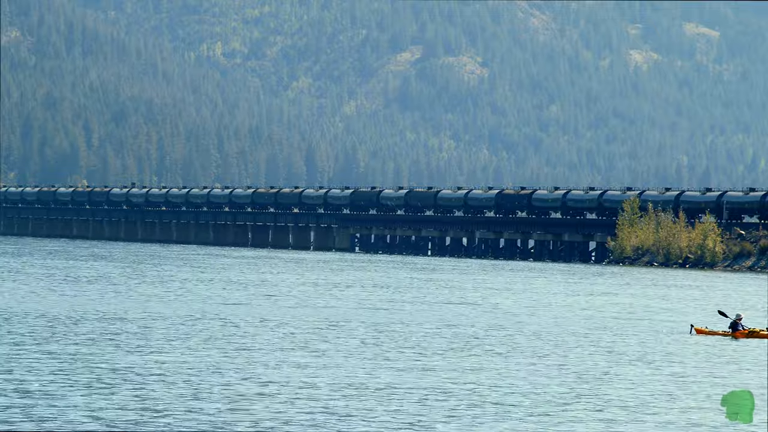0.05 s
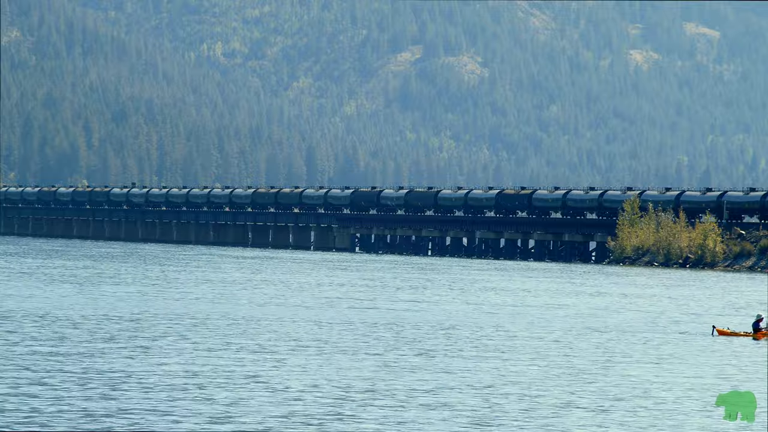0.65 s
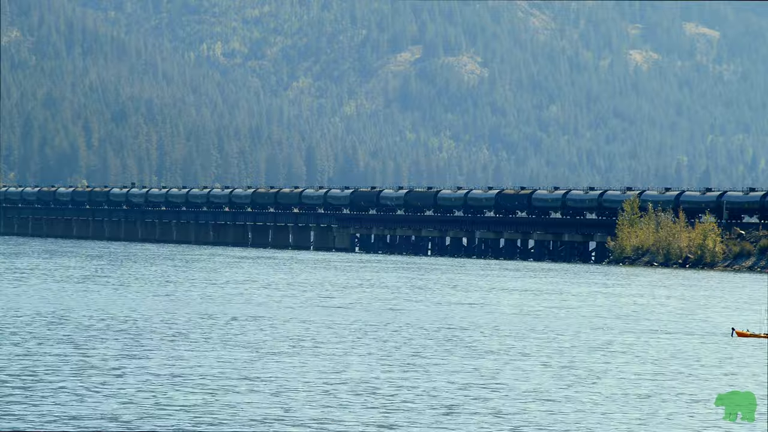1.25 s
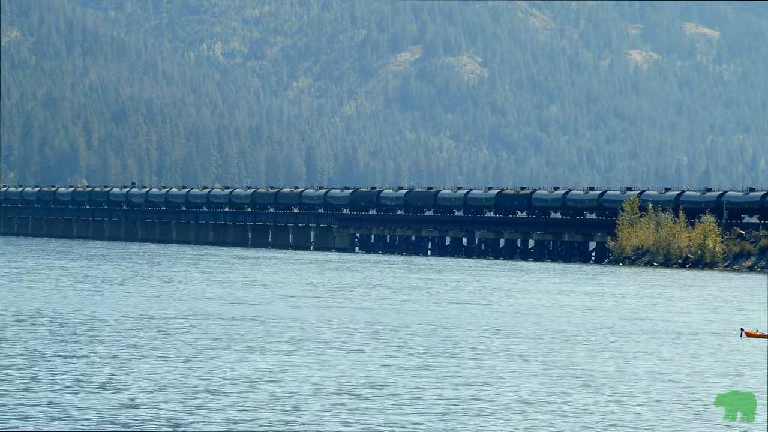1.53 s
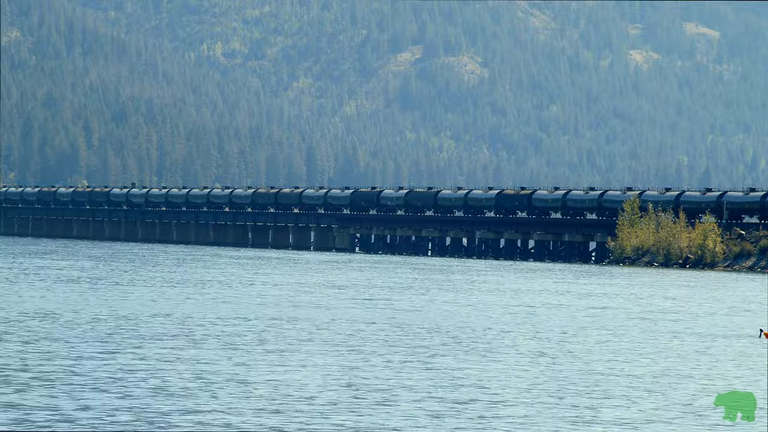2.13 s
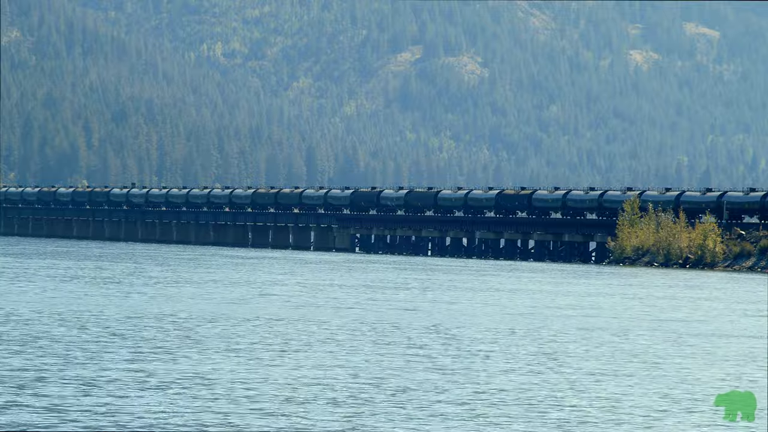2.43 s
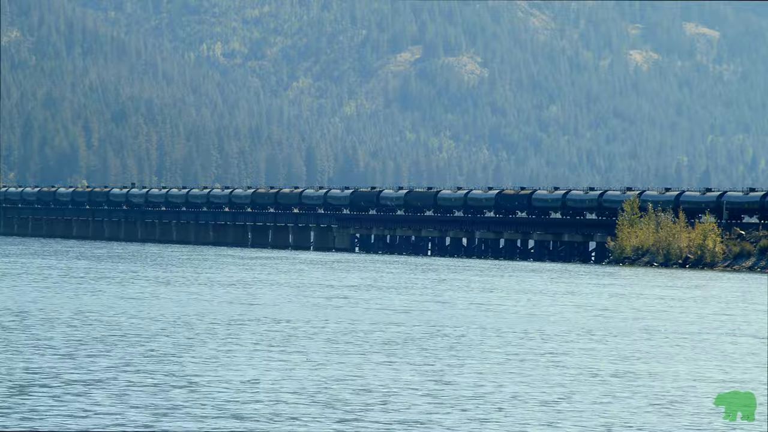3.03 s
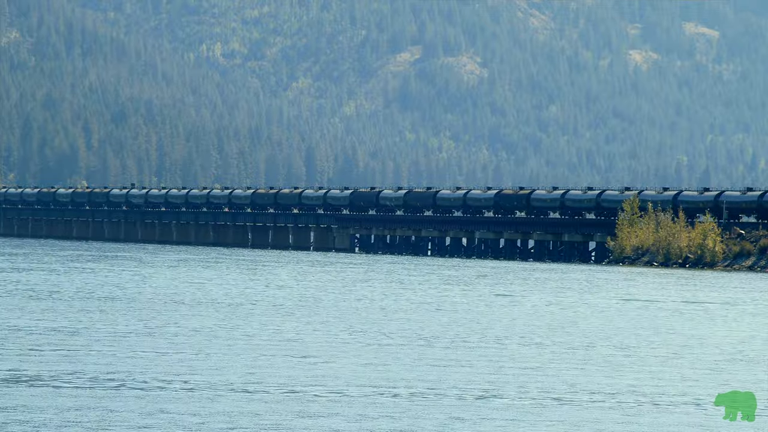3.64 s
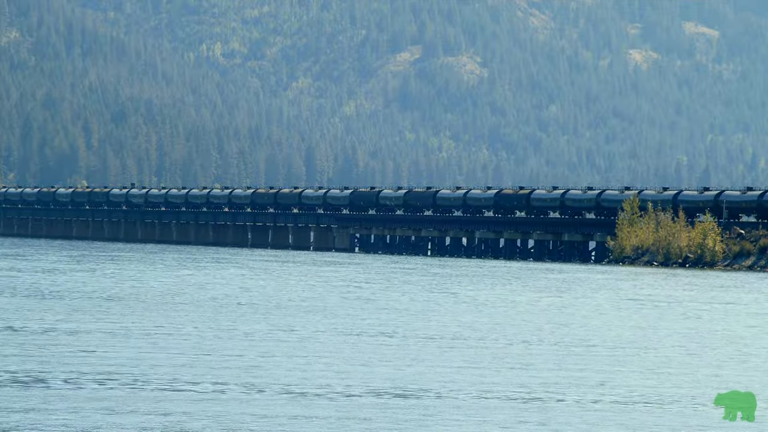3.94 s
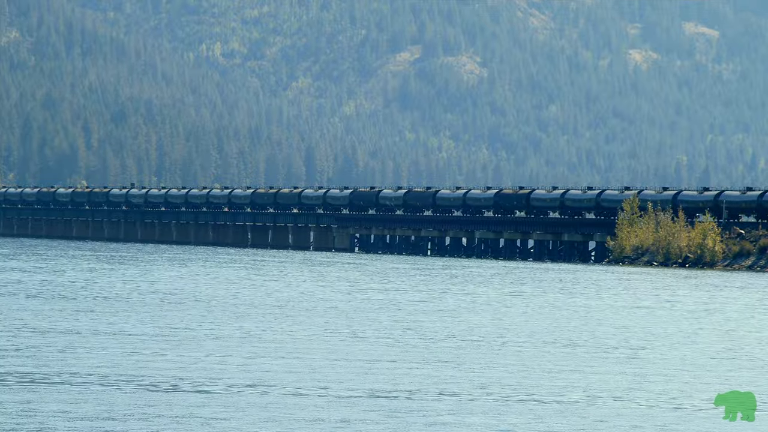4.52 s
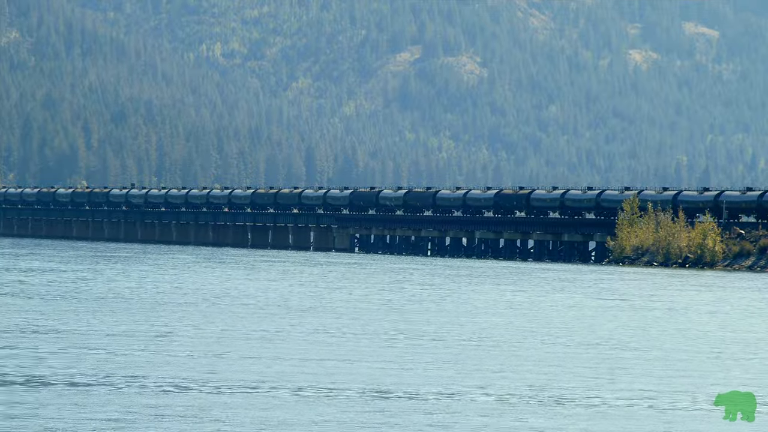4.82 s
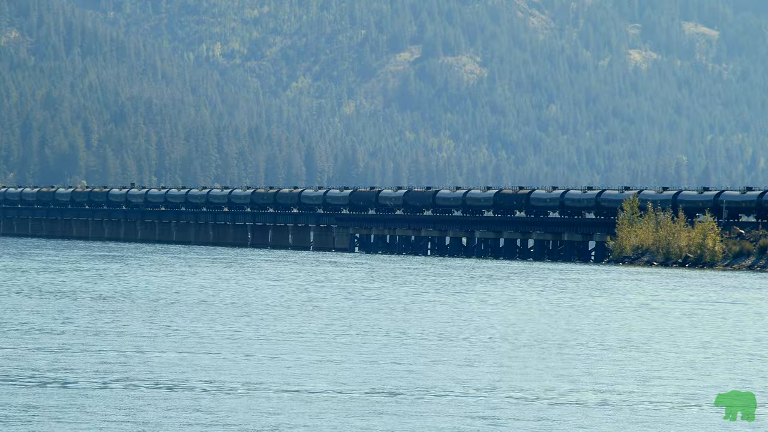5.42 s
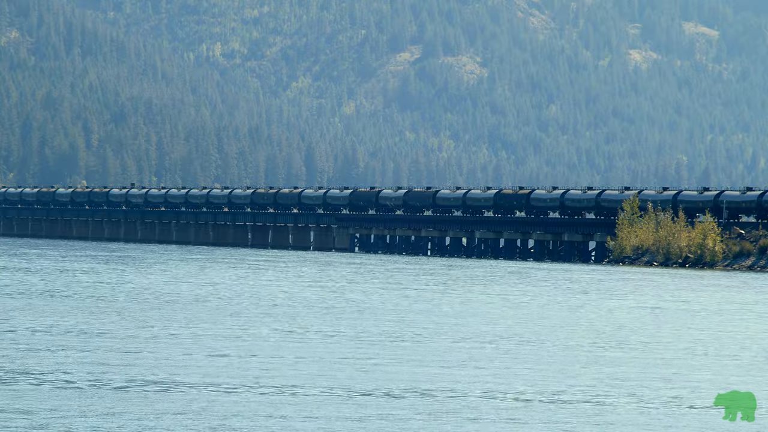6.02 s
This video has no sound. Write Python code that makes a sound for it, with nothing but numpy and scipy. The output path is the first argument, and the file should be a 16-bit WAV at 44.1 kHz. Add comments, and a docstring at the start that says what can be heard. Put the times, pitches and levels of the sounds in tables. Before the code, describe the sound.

Throughout, a distant freight train crosses a trestle over a lake: a dull, steady wheel roar, slightly right, with low droning tones that waver and come and go. The hillside adds a bassy echo, and light wind rumbles faintly on the microphones. Close by, small waves wash a gravel shore with soft fizz, ticks of spray and tiny ringing bubbles. One gentle wash swells from 1 to 1.5 seconds, followed by a rounded plop near 1.9. At about 3.2 seconds a bigger wave slaps down in the middle, with a quick run of sloshes until 4.2. Trapped air thumps and throbs deeply beneath it until about 5 seconds, as churning bubbles and foam run off to the left. This second half is louder and splashier. Around 5.8 seconds another wash rises with bright fizz and sharp droplets, still running at the end, just after 6 seconds.

```python
"""A dull roar of wheels and a wavering drone: a long freight train crosses a trestle far over a lake,
echoed by the hillside and heard from the shore by a spaced pair of microphones.
Close by, small waves wash the gravel with fizzing foam, ticks of spray and ringing bubbles.
One slaps down in the middle, booms with trapped air, and runs off to the left in bubbles and fizz."""
import sys
import numpy as np
from scipy import signal
from scipy.fft import rfft, irfft
from scipy.io import wavfile
from scipy.ndimage import map_coordinates

SR = 44100
rng = np.random.default_rng(int(sys.argv[2]) if len(sys.argv) > 2 else 0)


def dump(signal):
    """Clip the signal to [-1, 1] and save it as 16-bit WAV at the path in sys.argv[1]."""
    limited = np.clip(np.atleast_2d(signal).T, -1, 1)
    pcm = np.round(limited * 32767).astype(np.int16)
    wavfile.write(sys.argv[1], SR, pcm)


N = 276418
T = np.arange(N) / SR
FREQ = np.maximum(np.arange(N // 2 + 1) * SR / N, 1)

# tone colour of the rolling wheels (frequency [Hz], relative level [dB])
ROAR_EQ = [(20, -13.5), (42, -11.5), (60, -1), (85, -2.5), (125, -7), (160, -2), (205, -6.5), (240, -9.5),
           (310, -18), (480, -15.5), (800, -15), (1050, -19), (1500, -25), (2200, -38.5), (3200, -69)]
# tones of the drone (mid-life pitch [Hz], glide [Hz/s], level before panning [dB], start [s], end [s])
DRONE_TONES = [(59.2, 0, -46, 0, 3.2), (106.5, 0, -47, 0, 4.1), (147, 0, -44.5, 0, 3.7),
               (200, 2.5, -46.5, 0, 4.1), (296, 0, -61, 0, 3.1), (479, 0, -60, 0, 3.1),
               (72, 0, -39.5, 3.4, 3.85), (76.5, 9, -36.5, 4.25, 4.6), (65, 0, -41, 4.3, 4.7),
               (72, 0, -38.5, 5.05, 6.27), (123.5, 0, -45, 3.3, 6.1), (55, 0, -43.5, 4.7, 5.4),
               (54.5, 0, -39.5, 5.75, 6.05), (186, 3, -50, 4.6, 5.7), (204, 0, -53, 5.0, 6.27),
               (336, 0, -57, 3.4, 6.27)]
# path of the wave front along the shore (time [s], lag of the left microphone [ms])
SHORE_PATH = [(1.2, 0.21), (2.4, -1.52), (3.1, 0.18), (3.75, -0.12), (4.2, -0.12), (4.6, -1.54),
              (5.4, -1.15), (6.27, 0.18)]
# small waves on the gravel, levels relative within each layer
# (start [s], run-up [s], drain [s], foam level [dB], fine foam level [dB], tumble level [dB])
SHORE_WAVES = [(-0.4, 0.45, 0.63, -67.5, -67.5, -53), (0.81, 0.046, 0.1, -66.5, -67, -65),
               (0.95, 0.55, 0.89, -59.5, -58.5, -51.5), (2.22, 0.21, 0.41, -65, -78, -64),
               (3.17, 0.68, 0.6, -54.5, -55.5, -57), (3.93, 0.22, 0.53, -52.5, -53, -55),
               (4.6, 0.32, 0.37, -58.5, -58.5, -72), (5.04, 0.11, 0.043, -72, -59, -68),
               (5.8, 0.37, 0.87, -51, -49.5, -49)]
# crests slapping down (time [s], level before low-pass [dB], rise [s], hold [s], decay [s], cutoff [Hz])
CREST_SLAPS = [(3.187, -32.8, .003, .04, .017, 7000), (3.312, -39, .014, .02, .02, 1700),
               (3.408, -39, .02, .01, .015, 1900), (3.45, -37.5, .02, .025, .02, 1200),
               (3.48, -34.5, .022, .038, .016, 4500), (3.588, -39, .016, .015, .02, 2000),
               (3.636, -35.5, .018, .025, .024, 2400), (3.717, -35.5, .01, .012, .012, 1000),
               (3.75, -37.5, .016, .035, .02, 1800), (4.156, -37.5, .014, .02, .015, 1000)]
# air pockets booming (peak time [s], pitch [Hz], level before panning [dB], half length [s])
POCKET_BOOMS = [(1.925, 85, -38, 0.0072), (3.215, 73.4, -26.5, 0.026), (3.472, 72, -24, 0.018),
                (3.573, 68, -24, 0.015), (3.804, 69.3, -26, 0.037), (4.093, 62.5, -26.5, 0.026),
                (4.851, 59, -24, 0.018), (4.956, 61, -25.5, 0.014)]
# the loudest drops of spray (time [s], pitch [Hz], level [dB], decay [s])
SPRAY_DROPS = [(0.815, 6660, -41.5, 0.002), (.893, 6030, -44, .0026), (1.041, 7420, -48, 0.0032),
               (1.115, 6250, -44, .0028), (1.176, 8600, -47, 0.0055), (1.261, 10000, -45, 0.0033),
               (1.306, 7400, -47, .002), (1.615, 7600, -43, .003), (1.737, 11000, -54, .002),
               (1.793, 6000, -43, .003), (1.914, 4650, -46, .003), (1.962, 7400, -41, 0.0022),
               (2.034, 7750, -48, .003), (2.211, 9000, -51, .004), (2.407, 6900, -45, 0.0023),
               (2.876, 6110, -60, 0.029), (2.933, 7200, -49, 0.0017), (3.311, 4520, -55, .005),
               (3.503, 2760, -47, .01), (3.540, 8360, -43, 0.0033), (3.607, 10100, -41, 0.0028),
               (3.690, 7500, -44, .006), (4.112, 8000, -44, .008), (4.143, 9000, -50, .007),
               (4.151, 4700, -42, .004), (4.436, 7900, -51, 0.0026), (4.493, 8800, -55, 0.0013),
               (4.688, 8380, -49.5, 0.0086), (4.715, 5040, -47, 0.0036), (5.077, 3220, -42, 0.0034),
               (5.186, 7100, -45, .003), (5.277, 7400, -49, 0.01), (5.299, 9500, -47, 0.0043),
               (5.352, 4120, -44, 0.0036), (5.366, 4300, -53, 0.0043), (5.778, 7760, -59.5, 0.039),
               (5.958, 7360, -36, .003), (6.128, 11200, -39, .003)]
# the loudest ringing bubbles (time [s], pitch [Hz], level [dB], decay [s], left minus right [dB])
BUBBLE_PLIPS = [(1.469, 4040, -43, .0025, -4), (1.926, 590, -29.5, .006, -9), (1.959, 695, -36, .007, -8),
                (2.163, 4740, -49, .0025, -8), (2.353, 4630, -49, .002, 12),
                (2.664, 3180, -42.5, .0025, 14), (3.426, 1145, -37, .007, -5),
                (3.767, 1215, -38.5, .014, 3), (4.153, 4570, -32, .0012, 0), (4.180, 5000, -43, .002, 0),
                (4.637, 3600, -49, .003, 0), (4.853, 2820, -39.5, .0035, 8), (5.004, 3050, -39.5, .0025, 8),
                (6.118, 3560, -37, .0035, -1)]
# tone colours of the water and the air (frequency [Hz], relative level [dB])
TUMBLE_EQ = [(120, -2), (250, -4), (400, -5.5), (750, -1), (1300, -2), (2000, -8.5), (3000, -15),
             (5000, -73)]  # churning water
SLAP_EQ = [(150, 18), (400, 3.5), (900, 4), (1500, -1), (2200, -7), (3000, -9.5), (4300, -18.5),
           (5500, -32), (9000, -22)]  # a crest's impact
CLOUD_EQ = [(18, -10), (28, 2), (42, -4), (66, -3.5), (80, -1.5), (98, -7), (130, -1.5), (190, -23.5),
            (260, -11), (500, -19.5)]  # air trapped under the wave
FOAM_EQ = [(1200, -0.5), (2200, -0.5), (3200, -2), (4500, -3.5), (6300, -8.5), (8000, -7.5), (10000, -9),
           (12500, -17), (15500, -27)]  # bursting foam
HISS_EQ = [(1500, 11.5), (3000, 8.5), (5000, -5), (8000, -3.5), (12000, -5), (15500, -5.5)]  # the even bed of hiss
BREEZE_EQ = [(15, 6), (25, 5), (38, 2), (90, -43)]  # wind rumble

TRAIN_LAG_MS = 0.56  # the left microphone hears the train this much later
ROAR_DB, ROAR_EXTRA_DB, ROAR_SETTLE_S = -36, 1.5, 0.63  # the roar opens a little stronger, then settles
BREAK_S, BREAK_ATTACK_S = 3.188, 0.042  # the big wave
SWELL_POWER, DRAIN_POWER = 0.61, 1.15  # a wave swells as a power of time and drains ever faster
DROP_OCTAVES, DROP_OCTAVES_PER_KHZ = 0.033, 0.024  # high drops burst in a wider band
SPLASH_DB, SPLASH_OCTAVES = -3, 0.9  # the broad splash around each tick
DROP_ATTACK_S, DROP_TOP_HZ = 0.0038, 11000
STRAY_DROP_DECAY_S, STRAY_PLIP_DECAY_S, STRAY_PLIP_PAN_DB = 0.0044, 0.0014, 11
PLIP_RISE = 0.0118  # how steeply a bubble's pitch climbs as it fades
TOP_HZ = 15450


def train_roar():
    """Hundreds of wheels merge to a roar, part direct, part off the hillside; the air takes the treble."""
    direct = arrive(rng.standard_normal(N), TRAIN_LAG_MS)
    hillside = surround(rng.standard_normal((2, N)), spacing_ms=3.87)
    wet = 1 / (1 + (FREQ / 600) ** 3.26)  # the echo is mostly bass
    roar = irfft(rfft(direct) * np.sqrt(1 - wet) + rfft(hillside) * np.sqrt(wet), N)
    level = amp(ROAR_DB + ROAR_EXTRA_DB * np.exp(-T / ROAR_SETTLE_S))
    return flicker(colour(roar, ROAR_EQ), rate=0.57, depth_db=1.1) * level


def train_drone():
    """Tones of engines and ringing steel come and go, wavering on their way over the water."""
    lag_s = np.array([[TRAIN_LAG_MS / 1000], [0]])
    out = 0
    for hz, glide, db, start, end in DRONE_TONES:
        pitch = hz + glide * (T - (start + end) / 2) + 0.29 * walk(3.86) + 0.84 * walk(24.8)
        fade = np.clip(np.minimum(T - start, end - T) / .25 + 1, 0, 1)  # full from start to end
        throb_db = 1.8 * walk(8)
        tone = np.sqrt(2) * np.sin(2 * np.pi * (np.cumsum(pitch) / SR - hz * lag_s))
        out = out + amp(db + throb_db) * fade * tone
    return out


def slaps():
    """Each crest hits the water in a burst of spray and ringing bubbles; softer sloshes are duller."""
    ringing = bubbles(1100, 900, 4800, cycles=9, scatter_db=1, count=24)
    splatter = bubbles(9000, 142, 7800, cycles=0.73, scatter_db=-2.0)
    spectrum = rfft(colour(splatter + 0.42 * ringing, SLAP_EQ))
    out = 0
    for start, db, rise, hold, decay, cutoff_hz in CREST_SLAPS:
        age = np.maximum(T - start, 0)
        burst = np.minimum(age / rise, 1) * np.exp(-np.maximum(age - rise - hold, 0) / decay)
        spray = irfft(spectrum / np.sqrt(1 + (FREQ / cutoff_hz) ** 6), N)
        out = out + amp(db) * burst * spray
    return out


def tumble():
    """Water tumbles in large bubbles along the shore, hardest once the big wave breaks."""
    swarm = bubbles(1400, 194.5, 4020, cycles=6.55, scatter_db=-0.5, count=24)
    front = arrive(swarm, curve(SHORE_PATH))
    spread = surround(rng.standard_normal((2, N)), spacing_ms=0.75)
    *_, tumble_db = np.transpose(SHORE_WAVES)
    churn = np.hypot(wave_envelope(tumble_db), break_envelope(db=-47, hold_s=0.31, fade_db_per_s=2))
    return colour(front + spread, TUMBLE_EQ) * churn


def trapped_air():
    """The cloud of air under the breaking wave throbs as one body; large pockets boom."""
    throb = colour(surround(rng.standard_normal((2, N)), spacing_ms=1.0), CLOUD_EQ)
    out = throb * break_envelope(db=-37, hold_s=1.0, fade_db_per_s=4)
    for time, hz, db, half_length in POCKET_BOOMS:
        swell = np.exp(-.5 * ((T - time) / half_length) ** 2)
        out = out + amp(db) * swell * np.sin(2 * np.pi * hz * (T - time) + rng.uniform(0, 2 * np.pi))
    return out


def foam_wash():
    """Foam bursts on the gravel in thousands of tiny bubbles, over a faint even hiss."""
    *_, foam_db, fine_db, _ = np.transpose(SHORE_WAVES)
    fizz = np.array([bubbles(2400, 1800, 14000, cycles=11, scatter_db=3.8, count=40) for _ in range(2)])
    # larger bubbles ring at the running front of the wave
    front = arrive(bubbles(420, 1500, 8000, cycles=26, scatter_db=2.5, count=48), curve(SHORE_PATH))
    foam = fizz + amp(-6) * front + rng.standard_normal((2, N))
    foam = colour(flicker(foam, rate=9, depth_db=1.1), FOAM_EQ)
    coarse = irfft(rfft(foam) / (1 + (FREQ / 6500) ** 6), N)
    fine = (foam - coarse) * wave_envelope(fine_db, drain_share=0.76)  # the finest bubbles go first
    hiss = amp(-69.0) * colour(rng.standard_normal((2, N)), HISS_EQ)
    return coarse * wave_envelope(foam_db) + fine + hiss


def drops():
    """Each drop bursts in a short, ragged tick with a fainter, broad splash."""
    age = T[:SR // 10]
    out = np.zeros((2, N + len(age)))
    hz = np.maximum(np.fft.rfftfreq(len(age), 1 / SR), 1)
    strays = stray_events(per_s=11, low_hz=4000, high_hz=11300, offset_db=-3, scatter_db=6)
    strays = [(*row, STRAY_DROP_DECAY_S) for row in strays]
    for time, centre, db, decay in list(SPRAY_DROPS) + strays:
        octaves = np.log2(hz / centre)
        tick = np.exp(-.5 * (octaves / (DROP_OCTAVES + DROP_OCTAVES_PER_KHZ * centre / 1000)) ** 2)
        splash = amp(SPLASH_DB) * np.exp(-.5 * (octaves / SPLASH_OCTAVES) ** 2)
        band = (tick + splash) / np.sqrt(1 + (hz / DROP_TOP_HZ) ** 8)
        spray = unit(irfft(rfft(rng.standard_normal((2, len(age)))) * band, len(age)))
        envelope = np.minimum(age / DROP_ATTACK_S, 1) * np.exp(-age / decay)
        start = int(time * SR)
        out[:, start:start + len(age)] += amp(db) * spray * envelope
    return out[:, :N]


def plips():
    """Single bubbles ring out clearly, rising in pitch as they surface."""
    age = T[:SR // 10]
    out = np.zeros((2, N + len(age)))
    strays = stray_events(per_s=30, low_hz=2400, high_hz=9500, offset_db=3, scatter_db=4)
    strays = [(*row, STRAY_PLIP_DECAY_S, rng.normal(0, STRAY_PLIP_PAN_DB)) for row in strays]
    for time, hz, db, decay, pan_db in list(BUBBLE_PLIPS) + strays:
        turns = hz * age * (1 + PLIP_RISE * np.minimum(age / decay, 10))
        ring = np.sin(2 * np.pi * turns) * np.minimum(turns / 2, 1) * np.exp(-age / decay)
        pan = amp([[pan_db / 2], [-pan_db / 2]])
        start = int(time * SR)
        out[:, start:start + len(age)] += amp(db) * pan / pan.mean() * ring
    return out[:, :N]


def breeze():
    """Light air stirs each microphone on its own in a low rumble."""
    return amp(-44.0) * colour(rng.standard_normal((2, N)), BREEZE_EQ)


def bubbles(per_s, low_hz, high_hz, cycles, scatter_db, count=12):
    """A swarm of bubbles in count sizes, each ringing a few cycles and rising in pitch; rms 1."""
    out = 0
    for hz in np.geomspace(low_hz, high_hz, count):
        age = np.arange(int(4 * cycles * SR / hz)) * hz / SR / cycles  # in decay times
        ring = np.exp(-age) * np.sin(2 * np.pi * cycles * age * (1 + 0.0593 * age))
        births = rng.random(N) < per_s / count / SR
        strength = amp(scatter_db * np.minimum(rng.exponential(size=N), 4))
        kicks = births * strength * rng.choice([-1, 1], N)
        out = out + np.sqrt(hz) * unit(signal.oaconvolve(kicks, ring)[:N])  # white on average
    return unit(out)


def stray_events(per_s, low_hz, high_hz, offset_db, scatter_db):
    """Random drops or bubbles that ride the foam's level (time [s], pitch [Hz], level [dB])."""
    *_, foam_db, _, _ = np.transpose(SHORE_WAVES)
    when, pitch, size = rng.random((int(per_s * N / SR), 3)).T
    time = when * T[-1]
    envelope_db = 20 * np.log10(np.interp(time, T, wave_envelope(foam_db)))
    db = envelope_db + offset_db + scatter_db * (2 * size - 1)
    return list(zip(time, low_hz * (high_hz / low_hz) ** pitch, db))


def wave_envelope(levels_db, drain_share=1):
    """Strength of the running water: each wave swells as it runs up, then drains away."""
    power = 0
    for (start, run_up, drain, *_), db in zip(SHORE_WAVES, levels_db):
        swell = np.clip((T - start) / run_up, 0, 1) ** SWELL_POWER
        ebb = np.exp(-(np.maximum(T - start - run_up, 0) / (drain * drain_share)) ** DRAIN_POWER)
        power = power + (amp(db) * swell * ebb) ** 2
    return np.sqrt(power)


def break_envelope(db, hold_s, fade_db_per_s):
    """Attack, hold and fade from the moment the big wave breaks."""
    age = T - BREAK_S
    return np.clip(age / BREAK_ATTACK_S, 0, 1) * amp(db - fade_db_per_s * np.maximum(age - hold_s, 0))


def arrive(x, lag_ms):
    """Place a sound by delay: it reaches the left microphone lag_ms after the right."""
    shift = lag_ms * SR / 2000  # half the lag a side, in samples
    return np.array([map_coordinates(x, [np.arange(N) + way * shift], order=3, mode="wrap")
                     for way in (-1, 1)])


def surround(pair, spacing_ms):
    """Two unrelated sounds as a field from all sides: long waves reach both microphones alike."""
    alike = np.sinc(2 * FREQ * spacing_ms / 1000)
    mid, side = irfft(rfft(pair) * np.sqrt([1 + alike, 1 - alike]), N)
    return unit(np.array([mid + side, mid - side]))


def colour(x, points):
    """EQ x through (frequency [Hz], level [dB]) points, with steep skirts beyond the ends; rms 1."""
    hz, db = np.transpose(points)
    skirts = 1 / np.sqrt((1 + (FREQ / hz[-1] / 2) ** 8) * (1 + (hz[0] / FREQ / 2) ** 8))
    gain = amp(np.interp(np.log(FREQ), np.log(hz), db))
    return unit(irfft(rfft(x) * gain * skirts, N))


def flicker(x, rate, depth_db):
    """Let every octave of x swell and sink on its own."""
    spectrum, octave = rfft(x), np.log2(FREQ)
    bands = (irfft(spectrum * np.maximum(1 - abs(octave - k), 0), N) for k in range(4, 15))
    return sum(band * amp(depth_db * walk(rate)) for band in bands)


def walk(rate):
    """Smooth random modulation of rms 1 that changes about rate times a second."""
    return unit(irfft(rfft(rng.standard_normal(N)) * np.exp(-(FREQ / rate) ** 2), N))


def curve(rows):
    """Join (time [s], value) rows by straight lines."""
    return np.interp(T, *np.transpose(rows))


def amp(db):
    """Decibels to gain."""
    return 10 ** (np.asarray(db) / 20)


def unit(x):
    """Scale to rms 1."""
    return x / np.sqrt(np.mean(x ** 2))


def scene():
    """The train and the trapped air lean to the right; above 7 kHz the image narrows toward the middle."""
    far = (train_roar() + train_drone()) * amp([[-1.4], [1.9]])
    deep = trapped_air() * amp([[-2.2], [1.6]])
    breaker = tumble() + slaps()
    left, right = amp(7.0) * foam_wash() + drops() + plips()
    width = .22 + .78 / (1 + (FREQ / 7000) ** 20)  # the image narrows above 7 kHz
    side = irfft(rfft(left - right) * width, N)
    sparkle = np.array([left + right + side, left + right - side]) / 2
    return far + deep + breaker + sparkle + breeze()


def record(dry):
    """A steep low-pass trims the very top."""
    return signal.sosfilt(signal.ellip(10, .1, 80, TOP_HZ, fs=SR, output="sos"), dry)


dry = scene()
out = record(dry)
dump(out)
```